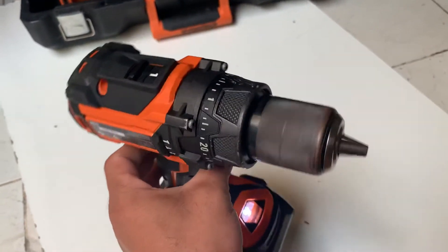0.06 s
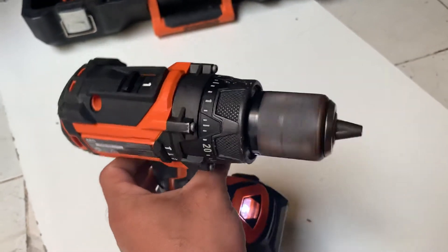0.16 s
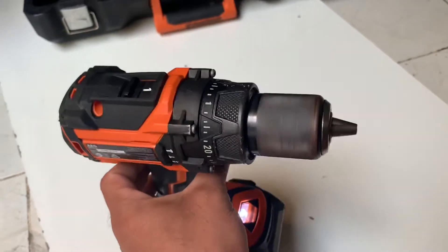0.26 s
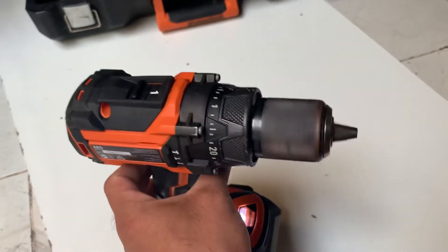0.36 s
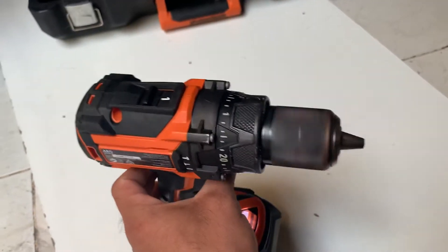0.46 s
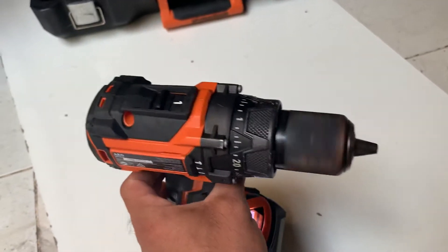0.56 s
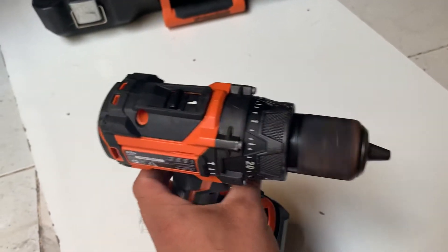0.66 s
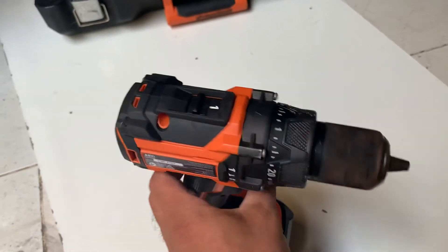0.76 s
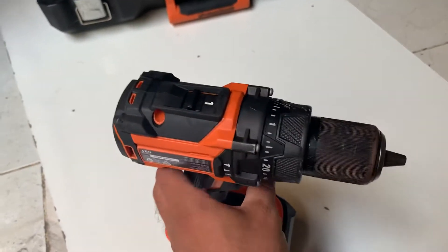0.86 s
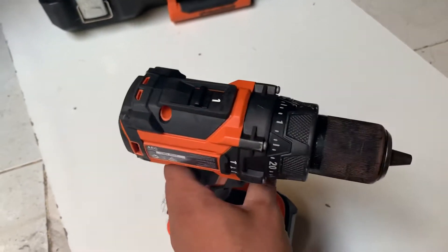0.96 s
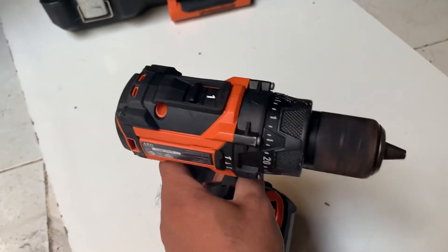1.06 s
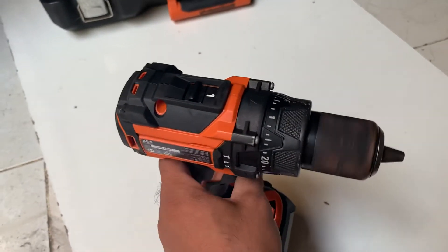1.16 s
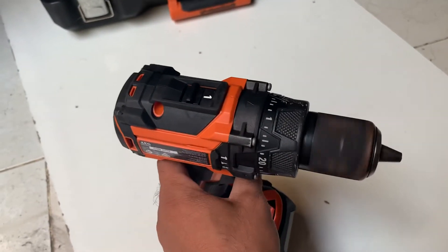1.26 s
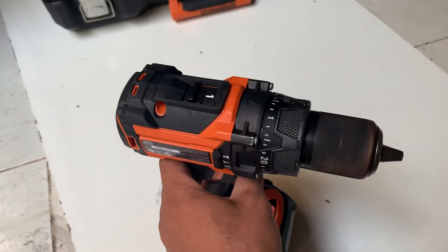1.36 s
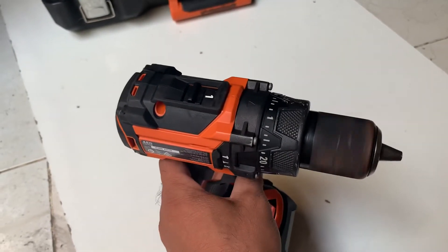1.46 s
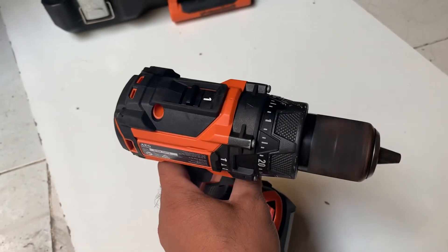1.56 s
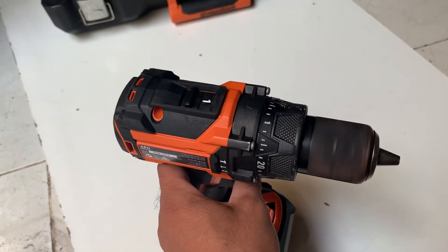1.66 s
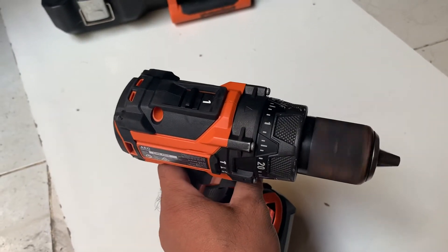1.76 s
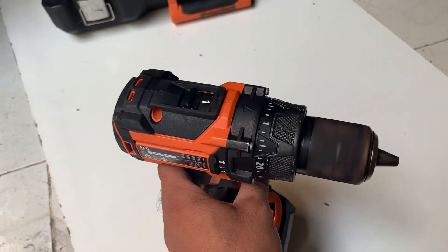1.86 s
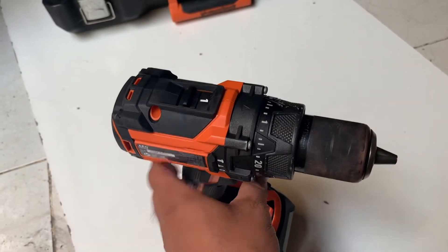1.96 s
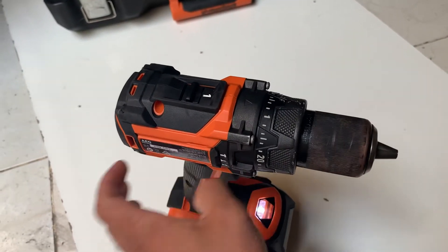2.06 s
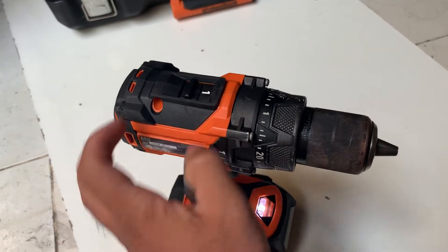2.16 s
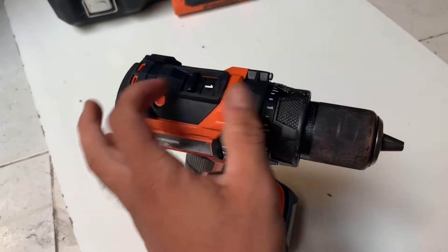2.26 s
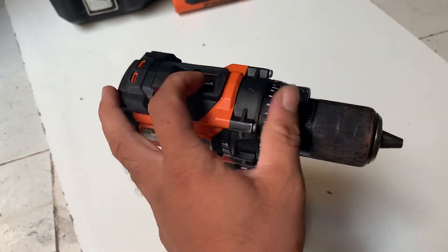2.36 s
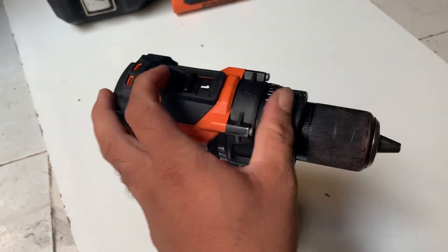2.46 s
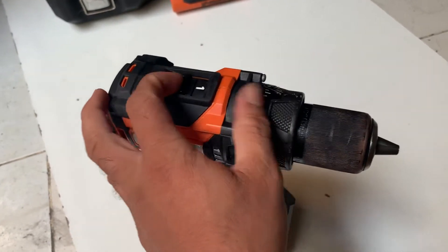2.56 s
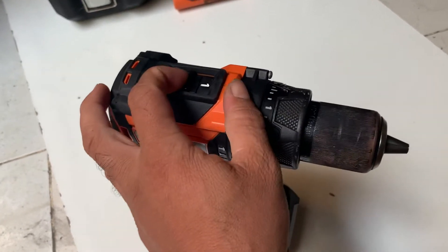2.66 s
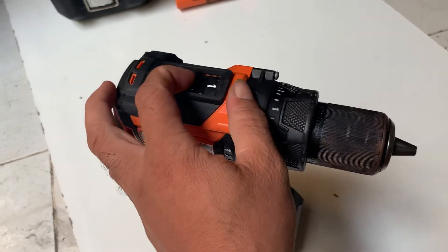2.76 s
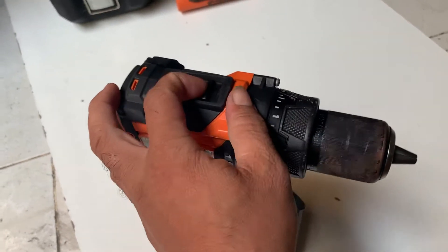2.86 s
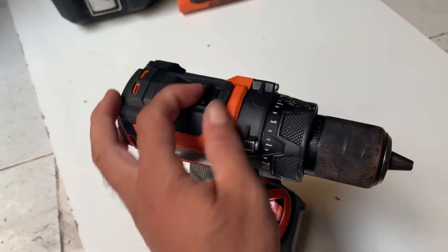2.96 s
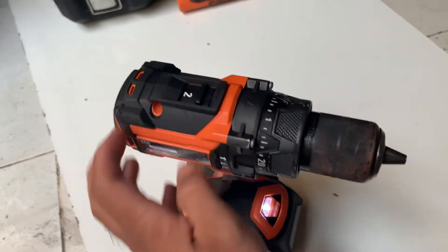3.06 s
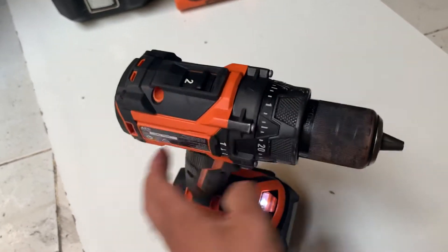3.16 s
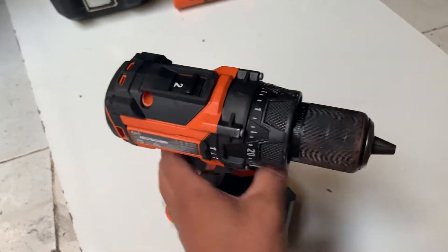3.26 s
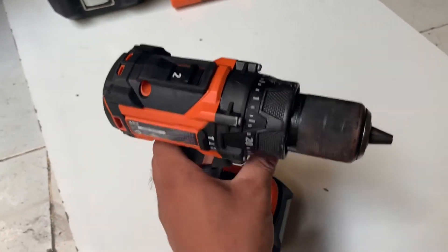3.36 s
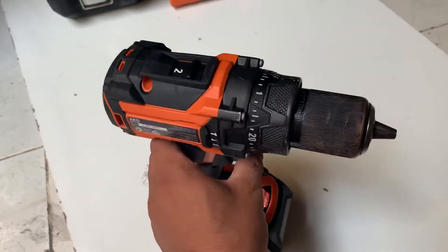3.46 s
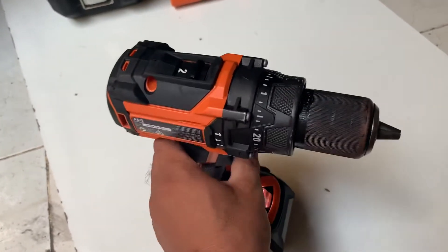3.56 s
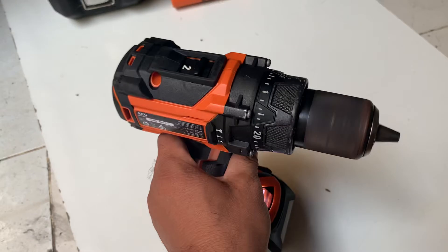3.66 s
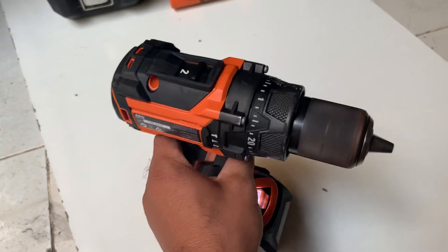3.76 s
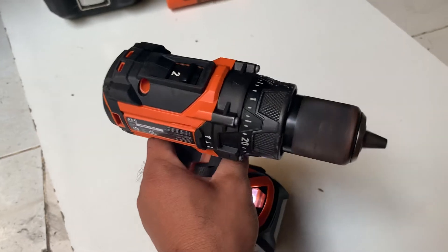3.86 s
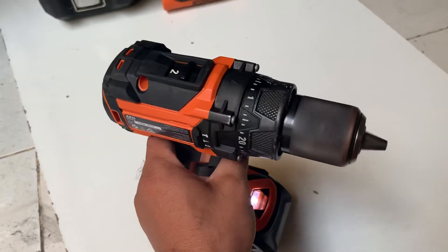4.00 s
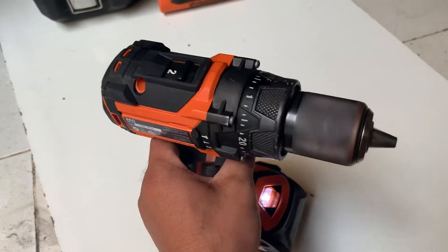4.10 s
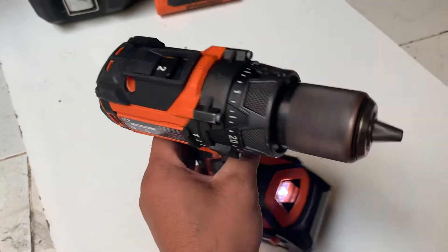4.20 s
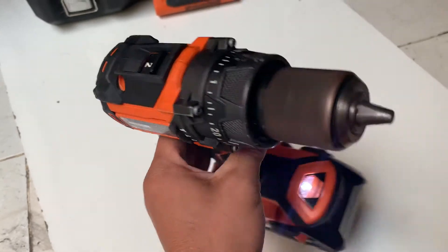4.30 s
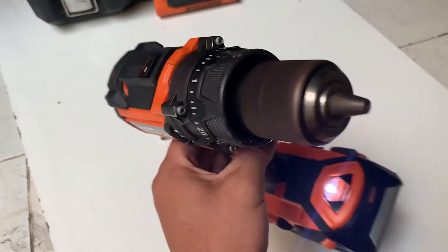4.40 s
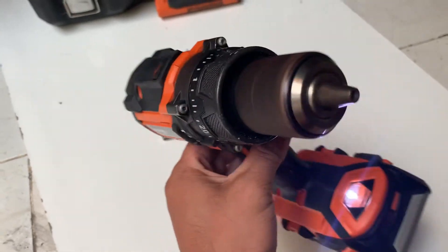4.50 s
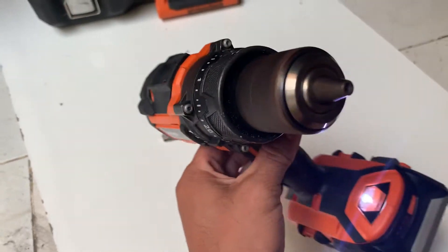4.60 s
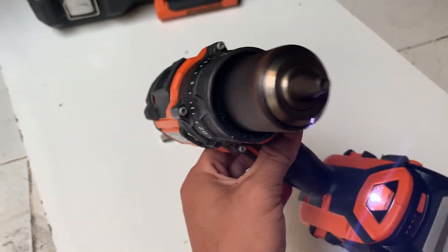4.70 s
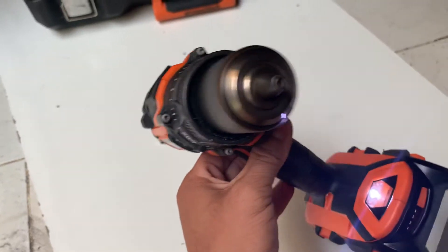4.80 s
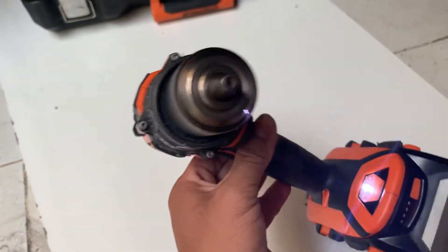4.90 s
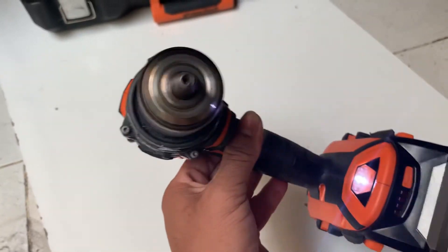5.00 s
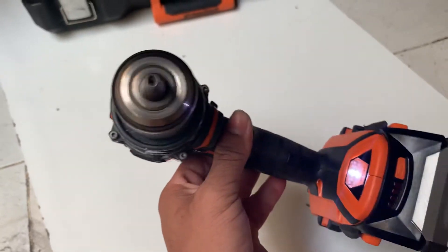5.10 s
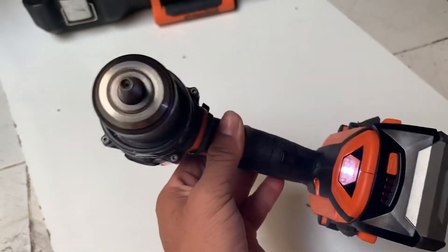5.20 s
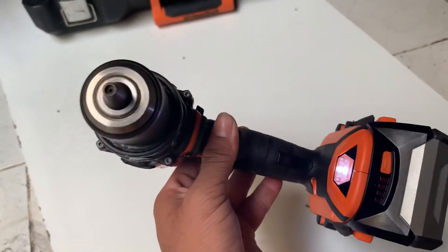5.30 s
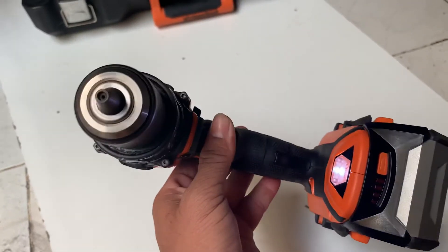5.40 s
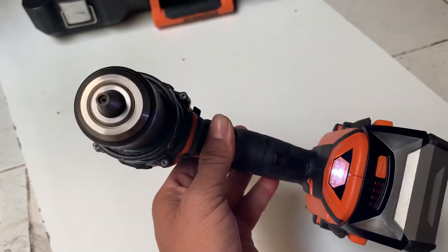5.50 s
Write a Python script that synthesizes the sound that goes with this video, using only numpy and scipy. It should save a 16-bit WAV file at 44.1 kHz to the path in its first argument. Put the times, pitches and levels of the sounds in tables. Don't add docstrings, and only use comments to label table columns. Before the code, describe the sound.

Close-up drill motor in a tiled room: two shrill low-gear runs with abrupt stops, a sharp switch click, then a longer, rougher run.

```python
import sys
import numpy as np
from scipy import signal
from scipy.fft import rfft, irfft, next_fast_len
from scipy.io import wavfile
from scipy.ndimage import map_coordinates

SR = 44100
rng = np.random.default_rng(int(sys.argv[2]) if len(sys.argv) > 2 else 0)


def gain_from_db(level_db):
    decades = np.asarray(level_db, float) / 20
    return 10 ** decades


def put_to_file(sound):
    columns = np.atleast_2d(sound).T
    safe = np.clip(columns, -1, 1)
    whole_steps = np.round(safe * 32767)
    wavfile.write(sys.argv[1], SR, whole_steps.astype(np.int16))


N = 244314

# press in seconds, release in seconds, brake in seconds, free shaft speed in Hz,
# gear (0 low, 1 high).
TRIGGER_PULLS = [
    (-1, 0.646, 0.6975, 405.95, 0),
    (1.0575, 1.815, 1.877, 405.85, 0),
    (3.5985, 9.5, 9.6, 403.75, 1),
]
# time in seconds, magnet whine in dB,
# its left-right difference in dB, its left lead in rad, fan blade tone in dB.
AIM_AT_PHONE = [
    [(0, -19, -7.5, -3, -39), (.1, -19, -6, -3, -41), (.2, -20.5, -6, -3.5, -39),
     (.3, -29.5, -4, -3.5, -43), (.35, -34, -6, -2.5, -44), (.4, -31.5, -7.5, -0.6, -46.5),
     (.5, -25.5, -2.5, 1, -45), (.62, -24, 0, 1.24, -40)],
    [(1.12, -21, 2.5, 1.8, -42), (1.2, -23, 2.5, 1.7, -41), (1.27, -20.5, 1, 2.7, -36),
     (1.32, -27.5, 11.5, 2, -42), (1.42, -25.5, 9.5, 1.2, -31), (1.6, -23.5, 3, 1.24, -33),
     (1.81, -22, 3, 1.8, -32.5)],
    [(3.71, -19.5, 1.5, 1.5, -31.5), (3.9, -19.5, 3.5, 2.5, -37.5), (4.08, -27, 12.5, 2, -27.5),
     (4.225, -32.5, -5.5, -2.5, -28), (4.29, -27, -8.5, -3.8, -26.5), (4.43, -23, -2.5, -4, -30),
     (4.6, -26, -3.5, -4.5, -35), (4.82, -26.5, 3.5, -4.5, -27.5), (5.5, -25.5, -5, -4, -33)],
]
# time in seconds, gear hiss in dB, winding tone in dB, unbalance in dB.
NEARNESS = [(0, -34, -41, -39.5), (.5, -34.5, -34.5, -39.5), (.64, -33.5, -37.5, -40.5),
            (1.1, -34.5, -41, -39.5), (1.22, -37, -40, -45.5), (1.35, -36, -40.5, -41.5),
            (1.8, -35.5, -38.5, -41), (3.66, -32, -39, -31), (3.73, -31.5, -38, -47),
            (3.9, -31.5, -41, -39), (4.3, -31.5, -40, -39), (4.65, -33.5, -41, -39.5),
            (4.85, -33.5, -41, -42.5), (5.54, -34, -34, -45)]
# time in seconds, output gear level in dB.
CHUCK_FACING = [
    (3.6, -10),
    (4.4, -18),
    (4.68, 1.5),
    (5.0, -3),
    (5.54, -3.5),
]
# multiple of shaft speed, level at full speed in dB,
# level under load in dB, left lead in rad.
WINDING_OVERTONES = [(12, -7, -12.5, .3), (16, -10, -8.5, 1.62), (20, -10.5, -11, 2.6), (24, -21, -21, .3),
                     (32, -17, -25, 0.95), (38, -27.5, -30, .2)]
# multiple of shaft speed, level in dB, left-right difference in dB,
# left lead in rad.
SHAKE_OVERTONES = [(2, -7.5, 4.5, 0.39), (3, -16.5, 3, .8), (5, -26.5, -5.5, 1.7)]
# multiple of shaft speed, level over gear hiss in dB, width in Hz.
TOOTH_MESHES = [
    [(2.88, -13.5, 30), (3.5, -14.5, 20), (4.05, -8, 65), (10.21, -11.5, 22)],
    [(2.88, -5.5, 30), (4.1, -8.5, 50), (5.57, -38, 20), (10.21, -11.5, 13)],
]
# centre in Hz, width in Hz, lift in dB.
SHELL_RESONANCES = [(930, 190, -1), (2960, 98, 13), (4700, 820, 3)]
# frequency in Hz, density in dB per Hz.
LOW_GEAR_HISS = [(500, -26.5), (800, -4.5), (1150, -3), (1350, -6), (1650, -2), (2800, -6), (3500, -4.5),
                 (4300, -2), (5500, -8), (7300, -6), (8600, -11.5), (10600, -14), (13000, -17),
                 (15000, -32.5)]
HIGH_GEAR_HISS = [(500, -33), (800, -8.5), (1150, -4), (1350, -7.5), (1650, -2.5), (2800, -9), (3500, -4.5),
                  (4300, -4.5), (5500, -9), (7300, -6.5), (8600, -15), (10600, -17.5), (13000, -22.5),
                  (15000, -32.5)]
SLOW_GEAR_HISS = [(500, -36.5), (800, -0.5), (1150, -1), (1350, -9), (1650, -4), (2800, -1), (3500, -2.5),
                  (4300, -5.5), (5500, -12.5), (7300, -11), (8600, -17), (10600, -23), (13000, -25),
                  (15000, -52)]
# frequency in Hz, lead in half cycles.
MIC_LEAD = [(600, .1), (1200, .42), (1650, 1), (2750, 2.2), (4600, 4), (5500, 3.6), (7200, 2.93),
            (7900, 2.7), (8800, 2.05), (10000, 1.9), (11000, 1.02), (12200, .98), (13000, .05), (15000, 0)]
# frequency in Hz, share of power.
MIC_SHARE = [(500, .5), (900, .85), (2500, .6), (5500, .5), (7200, .85), (9000, .97), (15000, .98)]
# time in seconds, peak in dB, 60 dB decay in seconds.
SLIDER_CLICKS = [
    (2.822, -31.5, 0.02),
    (2.8265, -23, .014),
    (2.8295, -12.5, 0.0038),
    (2.831, -14.5, 0.01),
    (2.8344, -28, 0.019),
    (2.843, -37, 0.023),
]
# frequency in Hz, density in dB per Hz.
SLIDER_PLASTIC = [(290, -72), (560, -50), (720, -7), (914, -4.5), (2070, -7), (4260, -4), (6940, -12),
                  (9380, -12.5), (15500, -23)]
# time in seconds, peak in dB, creak over the thud in dB.
PHONE_BUMPS = [(0.349, -27, -16), (0.881, -37.5, -14), (0.959, -52, -16), (1.005, -38, -15.5),
               (2.124, -32, -4), (2.277, -40.5, 1.5), (2.316, -35, -4), (2.342, -32.5, -6.5),
               (2.445, -34.5, -24), (2.505, -33, -10), (2.778, -35, -23), (2.94, -32, -29),
               (3.035, -34, -17), (3.098, -28, -15), (3.137, -32.5, -15), (3.176, -29, -14),
               (3.407, -30.5, -14), (3.469, -30.5, -15), (4.349, -39.5, -12), (4.58, -32.5, -4),
               (4.799, -36.5, 3), (5.353, -25, -19)]
# frequency in Hz, 60 dB decay in seconds.
ROOM_DECAY = [(300, 0.34), (3000, 0.19), (12000, 0.097)]
# frequency in Hz, level in dB.
WALL_REACH = [(450, -2), (800, 0)]
# time in seconds, firing tone in Hz, level in dB.
FAR_ENGINE = [
    (2.3, 119.8, -50),
    (2.6, 128.9, -49),
    (2.8, 156.1, -42),
    (2.95, 174.7, -51),
    (3.1, 176.3, -41),
    (3.3, 176, -43.5),
    (3.5, 170.2, -45.5),
    (3.8, 149.5, -49),
]
# time in seconds, deep part in dB, upper part in dB.
RUMBLE_LEVEL = [(0.0, -49.5, -49.5), (0.85, -45.5, -49), (1.16, -51.5, -52.5), (1.8, -46, -46),
                (2.7, -52, -50), (3.29, -47, -44), (5.54, -51.5, -53)]
# time in seconds, level in dB.
WASH_LEVEL = [(0.0, -48.5), (2.04, -46), (2.15, -40.5), (2.31, -40), (2.38, -47.5), (3.57, -46.5),
              (3.62, -44.5), (3.77, -47.5), (5.54, -61)]
# frequency in Hz, density in dB per Hz.
DEEP_RUMBLE = [(15, -62), (35, -12), (55, -2), (110, -4), (150, -10.5), (250, -71)]
UPPER_RUMBLE = [(80, -57), (130, -3.5), (190, -0.5), (280, -5), (360, -8), (600, -62)]
TRAFFIC_WASH = [(250, -68), (380, 0.5), (550, 0), (780, -10.5), (1100, -55)]
ROOM_AIR = [(410, -27), (700, -9), (888, -4), (1060, -3.5), (4150, -15), (6520, -24.5), (11500, -44),
            (14000, -47)]
# frequency in Hz, left-right correlation.
LIKENESS = [(40, 0.68), (130, 0.21), (300, 0.57), (700, 0.11), (1400, -0.14), (15000, 0.043)]

SIDES = np.array([[0.5], [-0.5]])
STOP_S = 0.095


def drill():
    t = np.arange(N) / SR
    press, release, brake, free_hz, gear = nearest_pull(t)
    shaft = shaft_speed(t, press, release, brake, free_hz, gear)
    turn = 2 * np.pi * np.cumsum(shaft * (1 + 0.00064 * wobble(60))) / SR
    load = np.clip((400 - shaft) / 60, 0, 1)
    levels = motor_levels(t, shaft, load, press, release, brake)
    whine_db, whine_pan_db, whine_lead, fan_db, wind_db, shake_db, hiss_db = levels

    out = magnet_and_fan(turn, load, whine_db, whine_pan_db, whine_lead, fan_db)
    out += winding(turn, shaft, load, wind_db)
    out += unbalance(turn, load, shake_db)
    out += tooth_meshes(turn, load, gear, hiss_db)
    out += gear_hiss(turn, load, gear, hiss_db)

    start, stop = press + 0.011, brake + STOP_S
    fade_db = -60 * np.maximum(start - t, 0) / 0.046 - 60 * np.maximum(t - stop, 0) / 0.061
    sounding = abs(t - np.clip(t, start, stop)) < 0.2
    return out * gain_from_db(fade_db) * sounding


def nearest_pull(t):
    rows = np.array(TRIGGER_PULLS)
    return rows[np.searchsorted(rows[1:, 0] - 0.1, t)].T


def shaft_speed(t, press, release, brake, free_hz, gear):
    quick_s, creep_s, creep_share = 0.0272, 0.076, 0.102
    coast_hz_per_s, brake_hz_per_s = 515, 2330
    on = np.maximum(t - press, 0) / 1.11 ** gear
    climb = 1 - (1 - creep_share) * np.exp(-on / quick_s) - creep_share * np.exp(-on / creep_s)
    sag = coast_hz_per_s * np.clip(t - release, 0, brake - release)
    fall = brake_hz_per_s * np.maximum(t - brake, 0)
    return np.maximum(free_hz * climb - sag - fall, 0)


def motor_levels(t, shaft, load, press, release, brake):
    whine_db, whine_pan_db, whine_lead, fan_db = curves(sum(AIM_AT_PHONE, []))
    hiss_db, wind_db, shake_db = curves(NEARNESS)

    def step(s):
        return np.clip((t - s) / 0.006, 0, 1)

    braking = step(brake)
    coasting = step(release) - braking
    bite = np.exp(-((t - press - 0.024) / 0.0095) ** 2)
    grab = braking * np.exp(-np.maximum(t - brake, 0) / 0.012)
    fade_db = -8 * np.clip(1 - (brake + STOP_S - t) / 0.02, 0, 1)

    whine_db += load * (-22.5 - whine_db)
    whine_db += coasting * (-33 - whine_db) + braking * (-23 - whine_db)
    bell_hz, bell_width_hz, bell_db, thin_db_per_hz = 2800, 350, 8.6, 0.024
    under = bell_hz - 8 * shaft
    ringing = np.maximum(braking, 0.5)
    whine_db += bell_db * ringing / (1 + (2 * under / bell_width_hz) ** 2)
    whine_db -= np.clip(thin_db_per_hz * under, 0, 22)

    shell_fan_db = -37 + 1.45 * shell_db(19 * shaft)
    fan_db += np.maximum(load, coasting) * (shell_fan_db - fan_db) + 9 * grab
    wind_db += 5.5 * braking + 10.5 * bite
    wind_db += -49 * np.clip(1 - shaft / 183, 0, 1)
    hiss_db += 1.5 * braking + 1.5 * bite + 2.5 * load * (1 - braking) + 3 * grab
    return (whine_db + fade_db, whine_pan_db, whine_lead, fan_db + fade_db,
            wind_db + fade_db, shake_db, hiss_db + fade_db)


def judder(load):
    return load * 6.0 * np.minimum(wobble(90), 0.6)


def magnet_and_fan(turn, load, whine_db, whine_pan_db, whine_lead, fan_db):
    db = whine_db + 0.5 * wobble(40) + 0.48 * judder(load)
    whine = tone(8 * turn, db, whine_pan_db, whine_lead)
    db = fan_db + 1.9 * wobble(30) + judder(load)
    return whine + tone(19 * turn, db, -1.2 + 1.65 * wobble(7.0), 1.96)


def winding(turn, shaft, load, wind_db):
    db = wind_db - 2.9 * (1 - load) + load * (shell_db(4 * shaft) - 0.5)
    db += 1.27 * wobble(30) + 1.4 * judder(load)
    out = tone(4 * turn, db, 1.6 * wobble(2.2) + 3.5 * load, 1.9 * wobble(4))
    for k, free_db, load_db, lead in WINDING_OVERTONES:
        db = wind_db + (1 - load) * free_db + load * (load_db + shell_db(k * shaft))
        db += 2.4 * wobble(25) + judder(load)
        out += tone(k * turn, db, -2.0 + 3.7 * wobble(3.7), lead + 0.5 * wobble(3.9))
    return out


def unbalance(turn, load, shake_db):
    rock = 1 + 0.25 * np.sin(turn / 13.5)
    out = rock * tone(turn, shake_db + 0.8 * wobble(17) - 12 * load, -0.59, 0.1)
    for k, db, pan_db, lead in SHAKE_OVERTONES:
        out += tone(k * turn, shake_db + db + 1.3 * wobble(13) - 8 * load, pan_db, lead)
    return out


def tooth_meshes(turn, load, gear, hiss_db):
    out = np.zeros((2, N))
    for g, meshes in enumerate(TOOTH_MESHES):
        for k, db, width_hz in meshes:
            is_output_gear = g == 1 and k < 3
            aim_db = curves(CHUCK_FACING)[0] * is_output_gear
            smear = wobble(width_hz) * np.sin(k * turn + SIDES * 1.2)
            smear += wobble(width_hz) * np.cos(k * turn + SIDES * 0.95)
            out += gain_from_db(hiss_db + db + aim_db - 9 * load) * smear * (gear == g)
    return out


def gear_hiss(turn, load, gear, hiss_db):
    fast = np.where(gear, noise_from_spot(HIGH_GEAR_HISS), noise_from_spot(LOW_GEAR_HISS))
    gears = (1 - load) * fast + 0.96 * load * noise_from_spot(SLOW_GEAR_HISS)
    chatter = 1 + 0.36 * np.sin(turn) + (0.081 + 0.29 * load) * wobble(300)
    return gain_from_db(hiss_db + 1.5 + 0.58 * wobble(9)) * chatter * gears


def shell_db(hz):
    lift = sum(gain_from_db(2 * db) / (1 + (2 * (hz - c) / w) ** 2) for c, w, db in SHELL_RESONANCES)
    return 10 * np.log10(0.4 + lift)


def slider():
    t = np.arange(SR // 10) / SR
    envelope = np.zeros((2, N + SR))
    for s, db, t60 in SLIDER_CLICKS:
        envelope[:, round(s * SR):][:, :len(t)] += gain_from_db(db - 1.5 - 60 * t / t60)
    return envelope[:, :N] * noise_from_spot(SLIDER_PLASTIC)


def bumps():
    t = np.arange(SR // 8) / SR
    thud, creak = np.zeros(N + SR), np.zeros(N + SR)
    for s, db, creak_db in PHONE_BUMPS:
        push = gain_from_db(db) * (1 - np.exp(-t / 0.0021))
        thud[round(s * SR):][:len(t)] += gain_from_db(-5.5 - 60 * t / 0.085) * push
        creak[round(s * SR):][:len(t)] += gain_from_db(creak_db + 1.5 - 60 * t / 0.038) * push
    return thud[:N] * noise_all_round(UPPER_RUMBLE)[0] + creak[:N] * noise_all_round(TRAFFIC_WASH)[0]


def room(x):
    hz, t, z = signal.stft(rng.standard_normal((2, SR // 2)), SR, nperseg=256)
    decay = gain_from_db(-60 * t / along(ROOM_DECAY, hz)[:, None])
    tail = signal.istft(z * decay, SR, nperseg=256)[1]
    late = np.pad(x, ((0, 0), (300, 0)))
    return signal.fftconvolve(late, tail / np.linalg.norm(tail[0]), axes=1)[:, :N]


def outside():
    hz, db = curves(FAR_ENGINE)
    db = np.where(db > FAR_ENGINE[0][2], db, -120) + 3.0 * wobble(29)
    engine_angle = 2 * np.pi * np.cumsum(hz * (1 + 0.024 * wobble(17))) / SR
    engine = tone(engine_angle, db, -1.8, 2.0)
    deep_db, upper_db = curves(RUMBLE_LEVEL)
    deep = gain_from_db(deep_db + 2.0 + 2.3 * wobble(11)) * noise_all_round(DEEP_RUMBLE)
    upper = gain_from_db(upper_db - 1.0 + 2.9 * wobble(13)) * noise_all_round(UPPER_RUMBLE)
    wash = gain_from_db(curves(WASH_LEVEL)[0] - 11.0 + 2.6 * wobble(13)) * noise_all_round(TRAFFIC_WASH)
    air = gain_from_db(-59.5 + 0.69 * wobble(4.74)) * noise_all_round(ROOM_AIR)
    return engine + deep + upper + wash + air


def tone(angle, db, pan_db, lead):
    return np.sqrt(2) * gain_from_db(db + SIDES * pan_db) * np.sin(angle + SIDES * lead)


def noise_from_spot(spectrum):
    def arrival(hz):
        return np.sqrt(along(MIC_SHARE, hz)) * np.exp(1j * np.pi * SIDES * along(MIC_LEAD, hz))

    shared = filtered(rng.standard_normal(N), arrival)
    apart = filtered(rng.standard_normal((2, N)), lambda hz: np.sqrt(1 - along(MIC_SHARE, hz)))
    return unit(filtered(shared + apart, lambda hz: colour(spectrum, hz)))


def noise_all_round(spectrum):
    def mid_and_side(hz):
        spread = np.arccos(np.clip(along(LIKENESS, hz), -1, 1)) / 2
        return colour(spectrum, hz) * [np.cos(spread), np.sin(spread)]

    mid, side = filtered(rng.standard_normal((2, N)), mid_and_side)
    return unit(np.array([mid + side, mid - side]))


def colour(spectrum, hz):
    return gain_from_db(along([(spectrum[0][0] / 2, -120)] + list(spectrum), hz))


def filtered(x, response):
    m = next_fast_len(N + SR // 2)
    return irfft(rfft(x, m) * response(np.fft.rfftfreq(m, 1 / SR)), m)[..., :N]


def unit(x):
    return x / np.sqrt(np.mean(x ** 2) + 1e-20)


def along(points, hz):
    f, v = np.transpose(points)
    return np.interp(np.log(hz + 1), np.log(f + 1), v)


def curves(rows):
    s, *cols = np.transpose(rows)
    return [np.interp(np.arange(N) / SR, s, c) for c in cols]


def wobble(rate):
    at = np.arange(0, N + 16, 16)
    knots = rng.standard_normal(int(N * rate / SR) + 5)
    return np.interp(np.arange(N), at, map_coordinates(knots, [at * rate / SR]))


def scene():
    near = drill() + slider()
    to_walls = filtered(near, lambda hz: gain_from_db(along(WALL_REACH, hz)))
    return near + gain_from_db(-12.5) * room(to_walls) + bumps() + outside()


def band_limit(x):
    return signal.sosfilt(signal.butter(12, 15670, fs=SR, output="sos"), x)


def record(dry):
    return band_limit(dry)


dry = scene()
out = record(dry)
put_to_file(out)
```